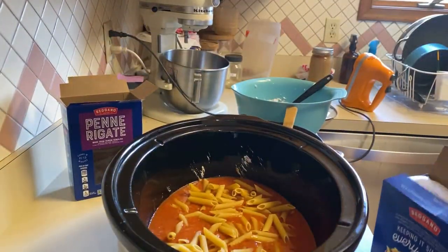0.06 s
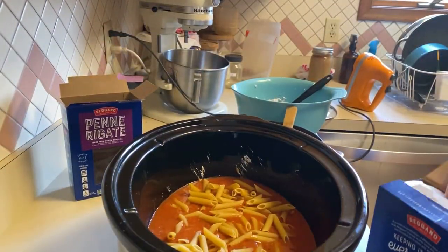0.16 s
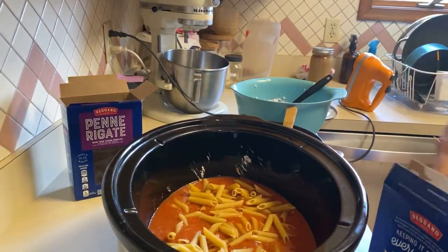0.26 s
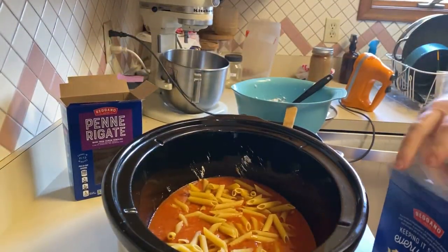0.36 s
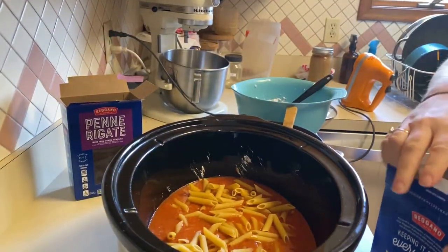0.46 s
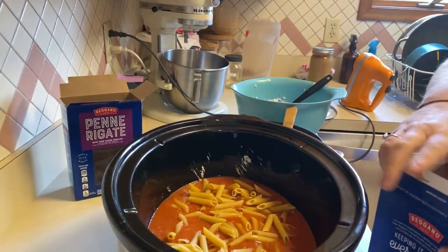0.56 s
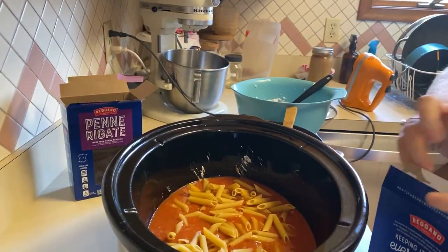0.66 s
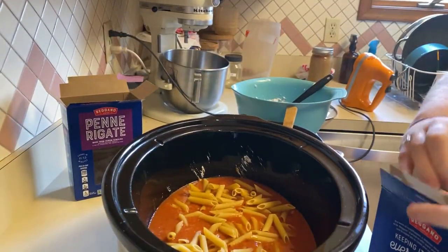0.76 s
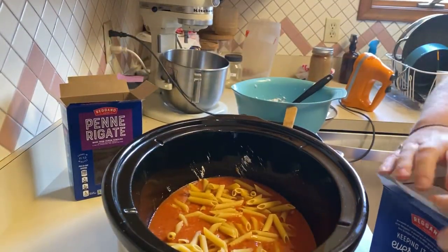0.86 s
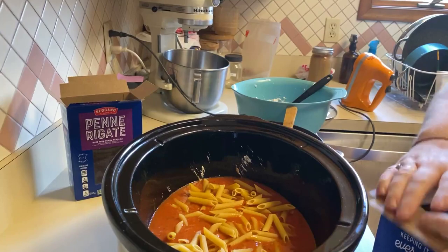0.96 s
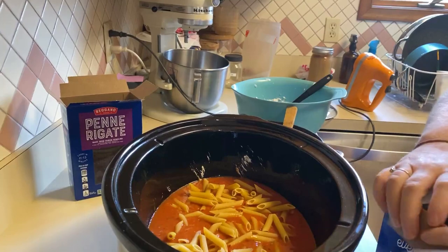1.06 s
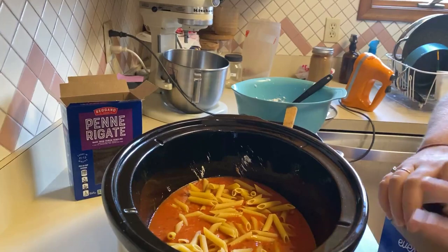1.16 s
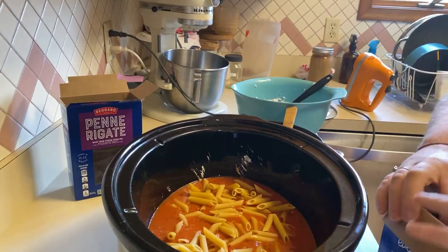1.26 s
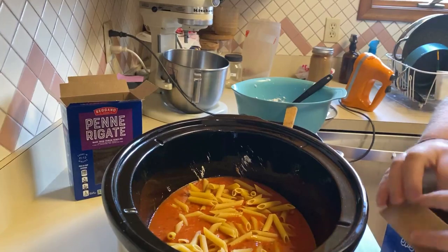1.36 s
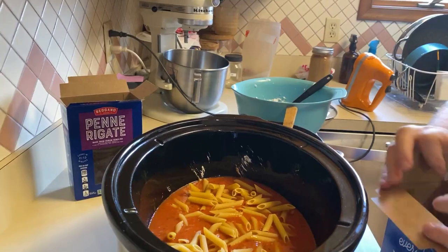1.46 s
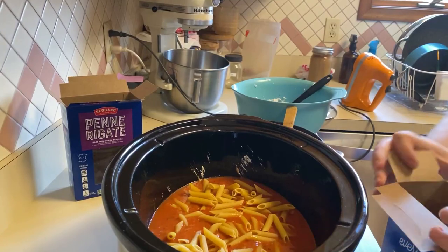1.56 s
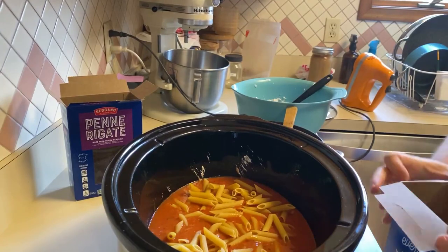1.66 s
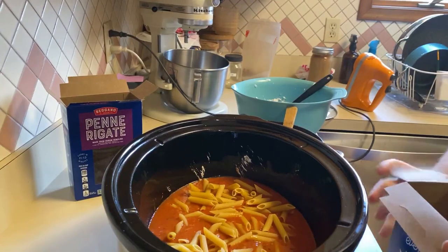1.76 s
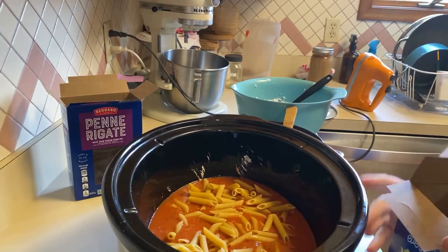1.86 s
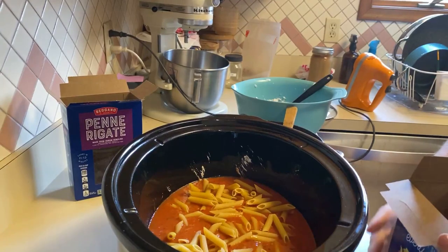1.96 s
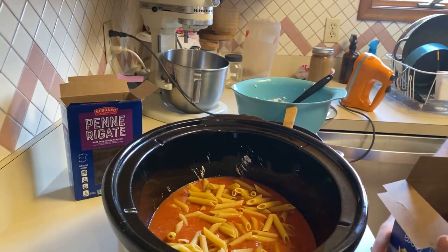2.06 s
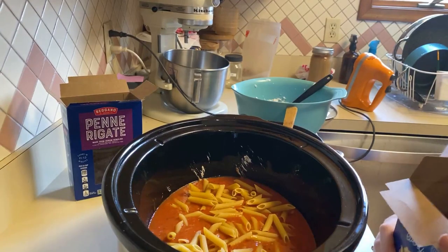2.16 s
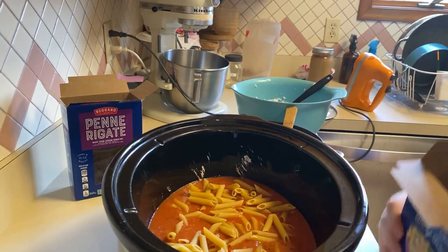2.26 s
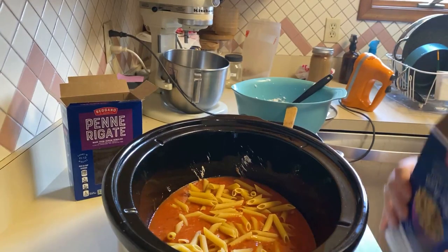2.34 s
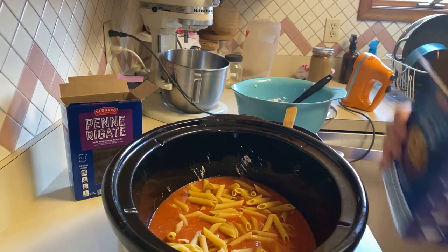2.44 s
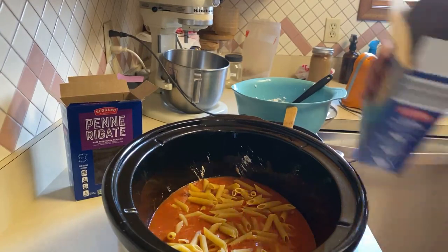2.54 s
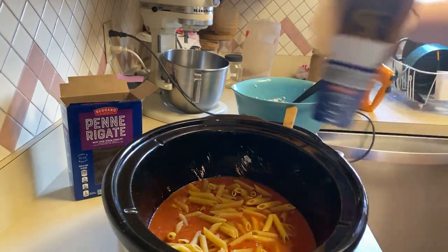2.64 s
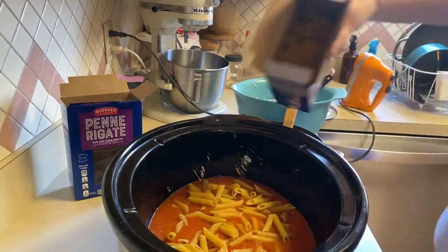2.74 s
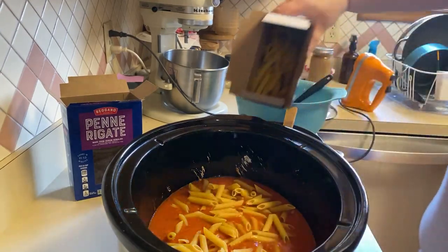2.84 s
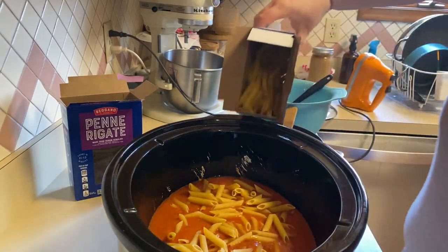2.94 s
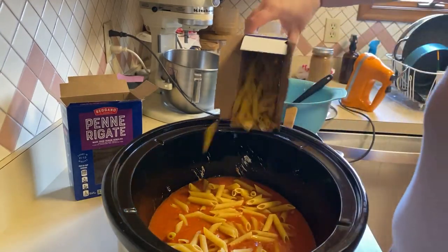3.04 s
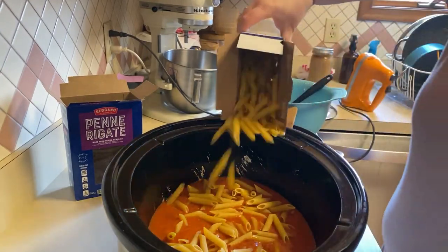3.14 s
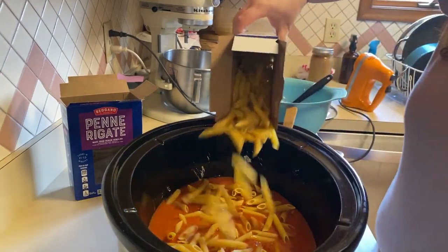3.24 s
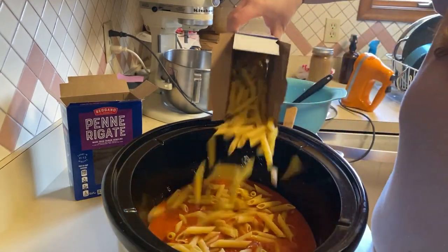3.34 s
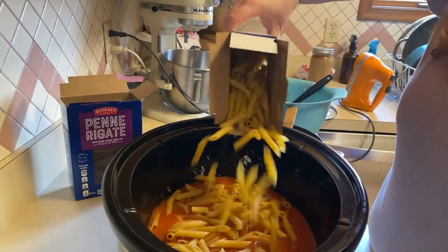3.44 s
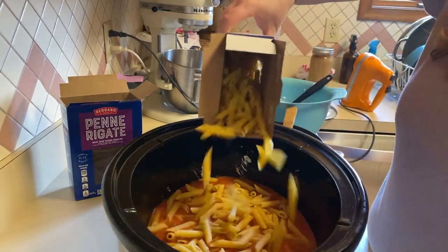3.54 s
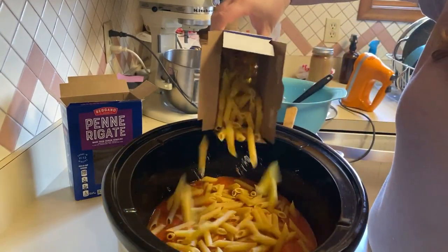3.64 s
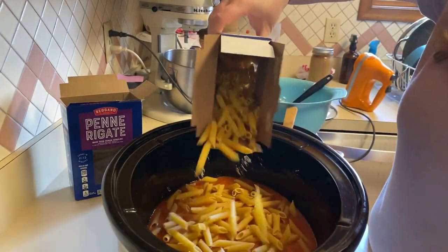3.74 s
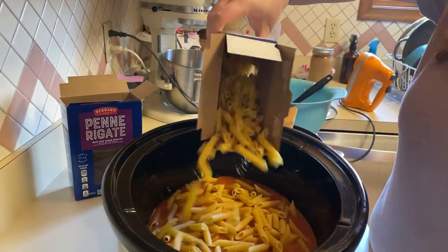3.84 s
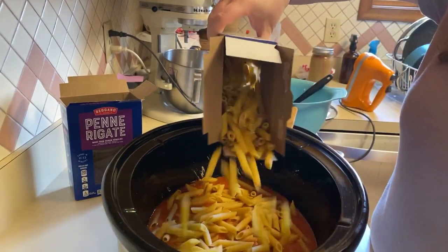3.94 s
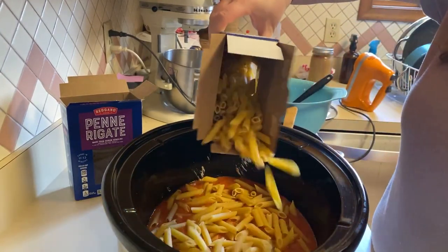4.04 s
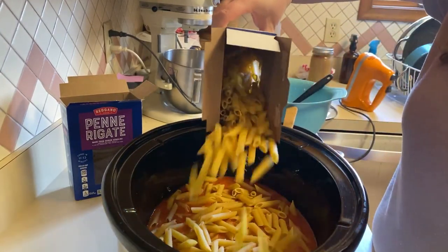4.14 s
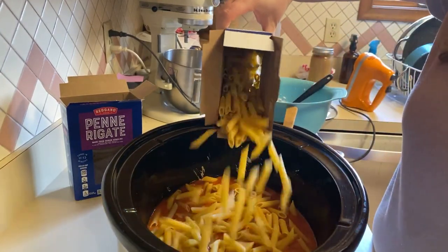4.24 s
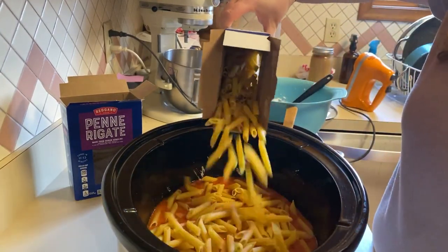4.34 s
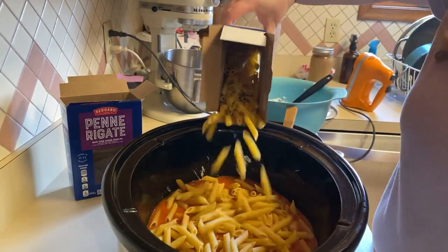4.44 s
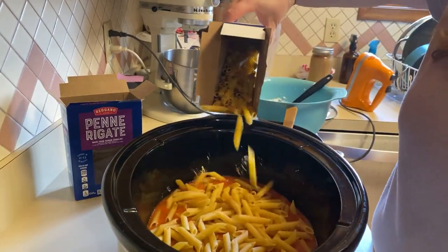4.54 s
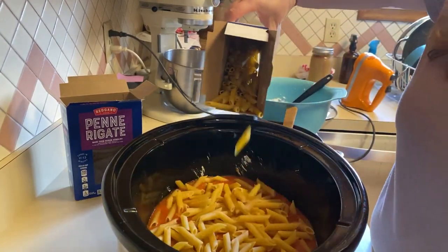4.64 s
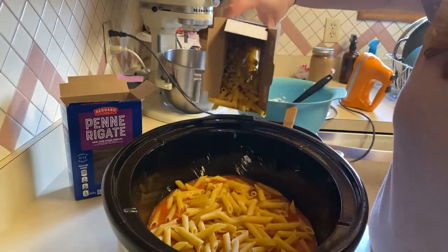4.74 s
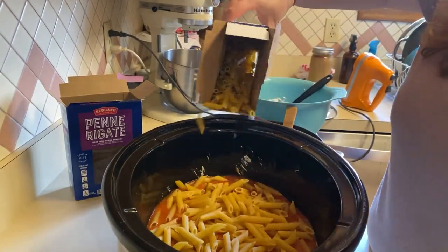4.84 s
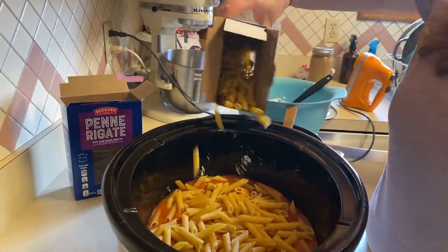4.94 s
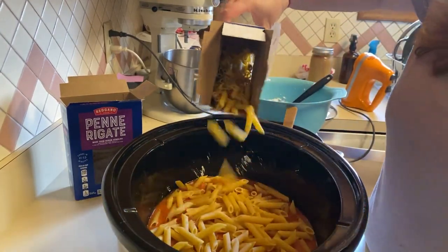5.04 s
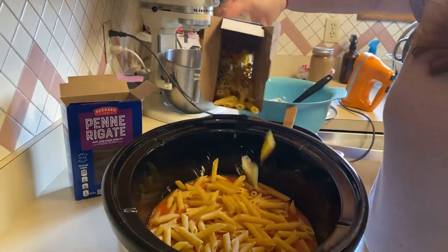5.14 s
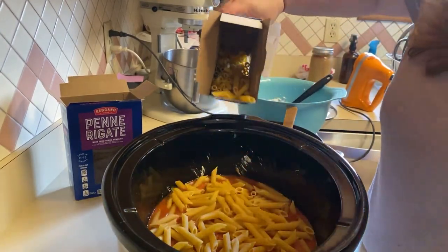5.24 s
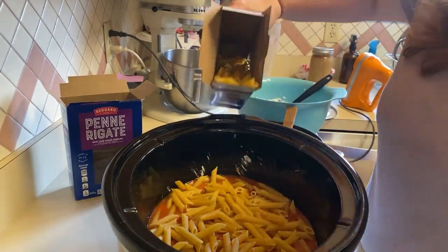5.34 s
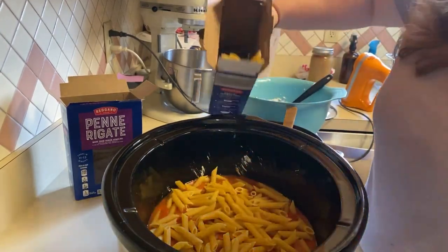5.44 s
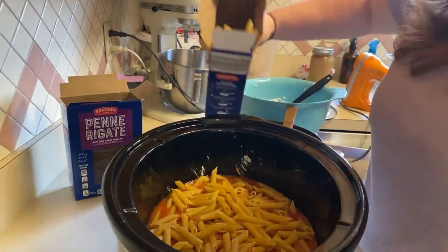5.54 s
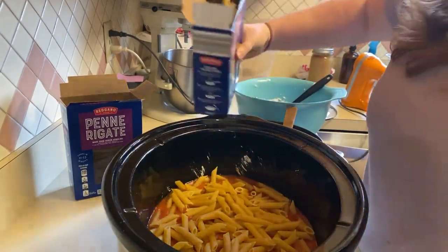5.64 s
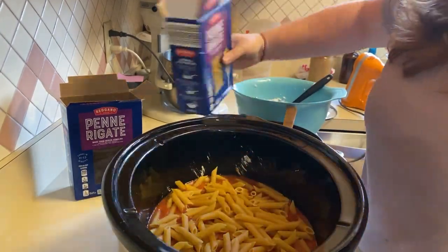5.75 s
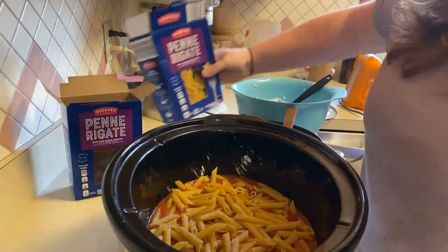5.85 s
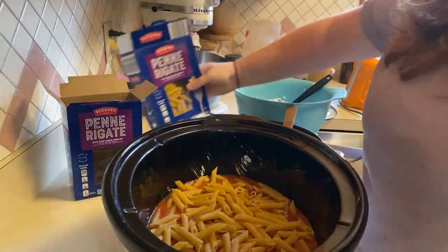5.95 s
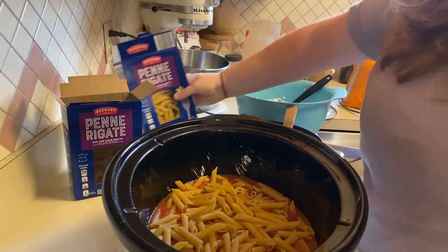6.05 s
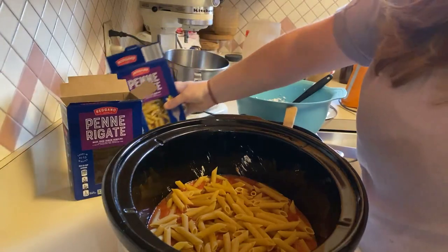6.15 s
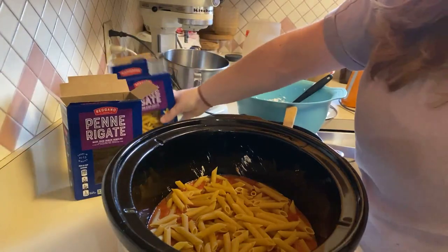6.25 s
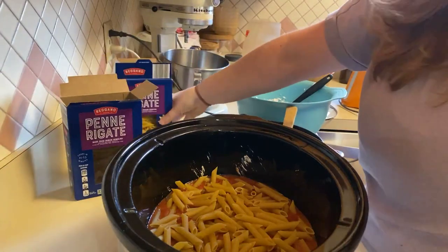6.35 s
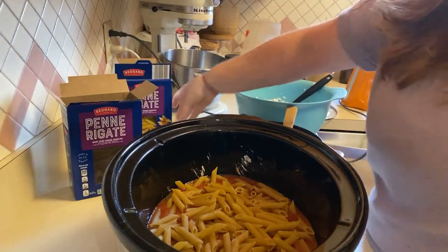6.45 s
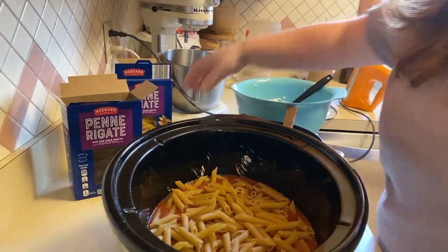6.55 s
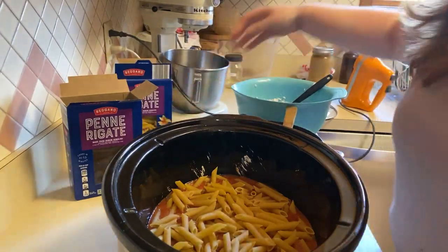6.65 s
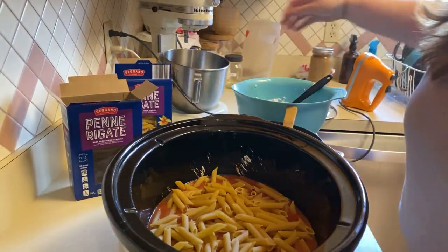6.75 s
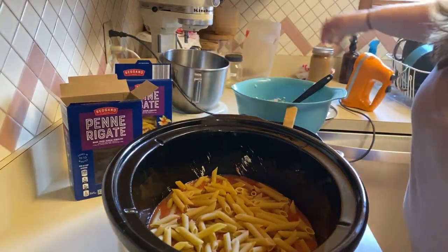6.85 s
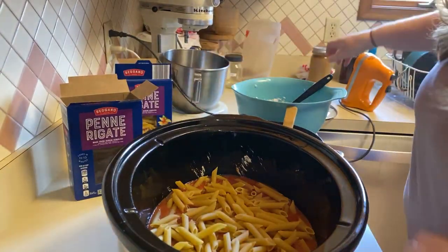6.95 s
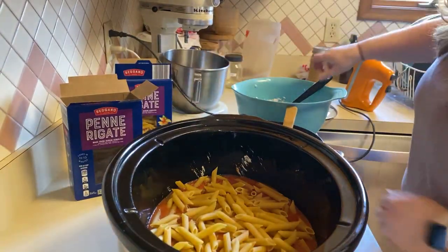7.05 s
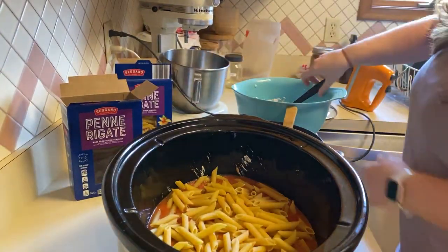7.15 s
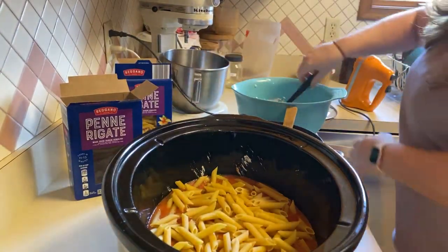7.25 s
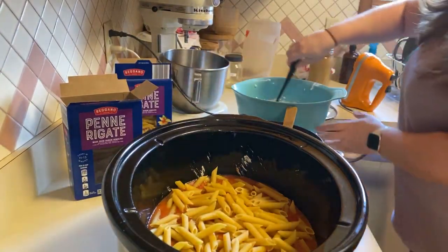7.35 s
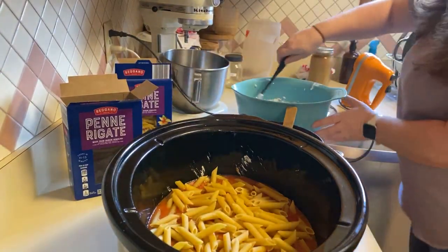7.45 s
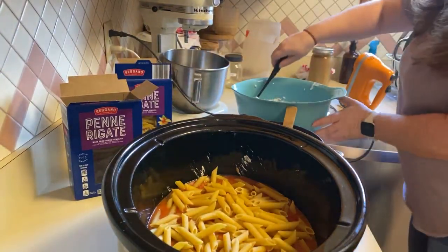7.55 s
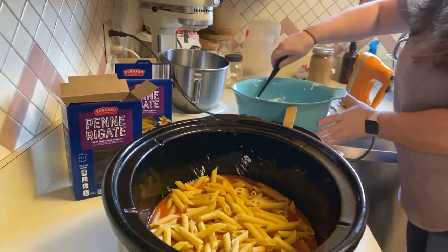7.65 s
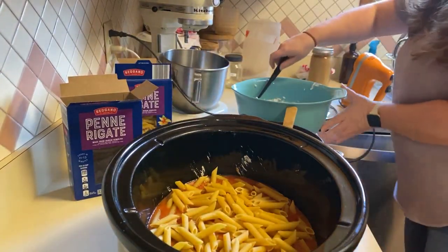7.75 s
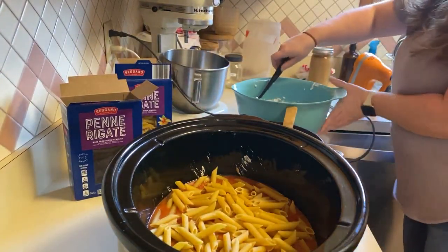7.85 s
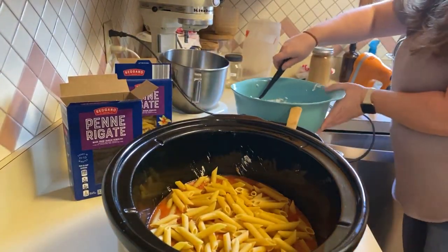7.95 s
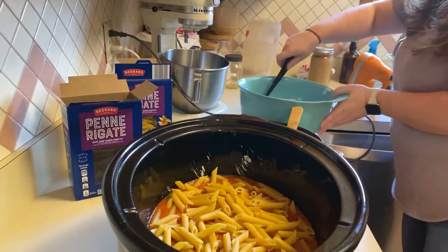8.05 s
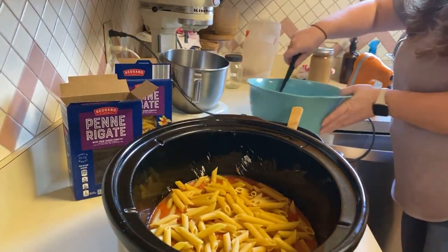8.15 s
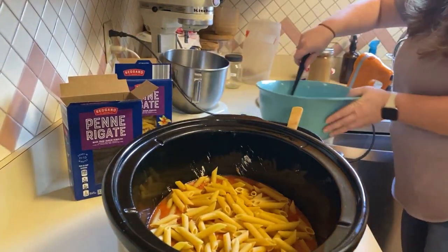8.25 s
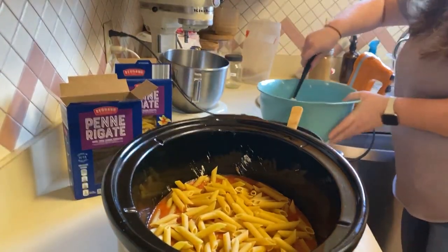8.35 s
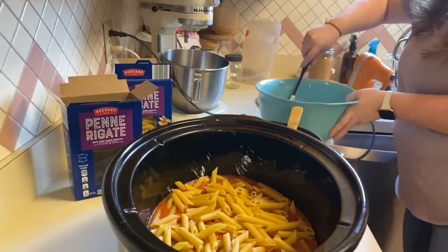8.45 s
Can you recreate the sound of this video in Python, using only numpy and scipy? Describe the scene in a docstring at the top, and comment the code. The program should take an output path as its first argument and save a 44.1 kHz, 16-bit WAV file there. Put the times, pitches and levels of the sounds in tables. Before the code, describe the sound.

Dry penne rattles inside cardboard, quiet fumbling follows, then a bright pour into a pot, last shakes, a boxy thud and a low bowl bump.

```python
"""Dry pasta poured from a box

A cardboard box of tube pasta is opened, tipped over a pot, shaken and set down; then a bowl is lifted.
Random collisions make walls rattle, tubes clink and box air sound; single knocks are scatters of ticks.
Coloured noise gives box boom, hollow room tone and hush; decaying sines give hollow knocks and thumps.
Rubs are noise in gliding resonances. Two ports hear direct sound and changing reflections.
"""
import sys
import numpy as np
from scipy import signal
from scipy.fft import rfft, irfft, next_fast_len
from scipy.io import wavfile
from scipy.ndimage import uniform_filter1d

SR = 44100
rng = np.random.default_rng(int(sys.argv[2]) if len(sys.argv) > 2 else 0)


def wav_record(signal):
    """Record a signal, one row per channel, as 16-bit PCM in the file named by sys.argv[1]."""
    frames = np.transpose(np.atleast_2d(signal))
    bounded = np.clip(frames, -1, 1)
    # unit amplitude maps onto the largest positive 16-bit level
    quanta = np.round(bounded * 32767).astype(np.int16)
    wavfile.write(sys.argv[1], SR, quanta)


N = 374850


def amp(db):
    """Decibels to amplitude ratio."""
    return 10 ** (np.asarray(db) / 20)


def evened(x):
    """Scales to rms 1."""
    return x / np.sqrt(np.mean(x ** 2) + 1e-20)


def peaked(x):
    """Scales to peak 1."""
    return x / abs(x).max()


def read(points, hz):
    """Interpolates a table over log frequency."""
    f, value = np.transpose(points)
    return np.interp(np.log(hz + 1), np.log(f + 1), value)


def curve(rows):
    """Interpolates (time_s, value) rows over the whole scene."""
    rows = np.array(sorted(rows))
    return np.interp(np.arange(N) / SR, rows[:, 0], rows[:, 1])


def add(mix, s, sound):
    """Mixes a sound in from s seconds, cut at the end."""
    part = mix[..., round(s * SR):][..., :sound.shape[-1]]
    part += sound[..., :part.shape[-1]]


def body(spectrum, modes=(), size=8192):
    """Causal impulse response of energy 1: minimum phase, with the given colour and resonances."""
    hz = np.abs(np.fft.fftfreq(size, 1 / SR))
    db = read(spectrum, hz)
    for mode_hz, width_hz, mode_db in modes:
        db = db + mode_db / (1 + (2 * (hz - mode_hz) / width_hz) ** 2)
    log_gain = np.log(amp(np.maximum(db, -100)))
    phase = -signal.hilbert(log_gain).imag
    taps = np.fft.ifft(np.exp(log_gain + 1j * phase)).real[:size // 2]
    return taps / np.linalg.norm(taps)


def drift(fast_s, slow_s):
    """Random curve of rms 1 that changes between the two time scales."""
    x = rng.standard_normal(N)
    for _ in range(2):
        x = uniform_filter1d(x, int(fast_s * SR))
    return evened(x - uniform_filter1d(x, int(slow_s * SR)))


def rattle(level_db, low_hz, high_hz, per_s, spread_db, cycles, clump_db, taps, count=11):
    """Many small collisions, each ringing briefly at its own pitch, in clumps."""
    size = amp(spread_db * np.minimum(rng.exponential(1, N), 4))
    size *= rng.random(N) < per_s / SR
    size = evened(size * amp(clump_db * drift(0.0042, 0.052)))
    size = size * rng.choice([-1., 1.], N) * amp(level_db)
    kind, t, out = rng.integers(0, count, N), np.arange(1500) / SR, np.zeros(N)
    for k, hz in enumerate(np.geomspace(low_hz, high_hz, count)):
        grain = np.exp(-np.pi * hz * t / cycles) * np.cos(2 * np.pi * hz * t)
        grain *= np.sqrt(hz / low_hz) / np.linalg.norm(grain)
        out += signal.oaconvolve(size * (kind == k), grain)[:N]
    coloured = signal.oaconvolve(out, taps)[:N]
    return coloured * np.std(size) / np.std(coloured)


def murmur(level_db, spectrum, lumpy_db, fast_s):
    """Coloured noise in lumps."""
    noise = signal.oaconvolve(rng.standard_normal(N), body(spectrum))[:N]
    return evened(noise * amp(lumpy_db * drift(fast_s, 0.065))) * amp(level_db)


def resonate(x, hz, width_hz):
    """Shifts the curve hz down to zero, smooths, and shifts back: a moving resonance of gain 1."""
    turn = np.exp(2j * np.pi * np.cumsum(hz) / SR)
    r = np.exp(-np.pi * width_hz / SR)
    return 2 * (turn * signal.lfilter([1 - r], [1, -r], x / turn)).real


def steeply(x, hz, width_hz):
    """The same resonance met twice, so that its flanks are steep."""
    return resonate(resonate(x, hz, width_hz), hz, width_hz)


def brighten(x, level_db):
    """Louder clinks are brighter: the top above 7 kHz grows faster than the level."""
    top = signal.sosfilt(signal.butter(2, 7000, "high", fs=SR, output="sos"), x)
    top_db = np.clip(0.9 * (level_db + 56.5), -25, 8)
    return x + (amp(top_db) - 1) * top


# stirring of tubes, cardboard or bowl, one level curve: time_s, level_db (relative)
STIR_POINTS = [
    [(0.0, -33.5), (0.016, -37), (0.082, -39.5), (0.124, -42), (0.246, -40), (0.274, -49), (0.35, -35.5)],
    [(0.36, -48), (0.372, -30.5), (0.514, -56), (0.526, -43), (0.546, -50), (0.572, -40), (0.622, -60),
     (0.644, -37.5), (0.78, -68)],
    [(0.79, -92), (0.83, -58), (0.884, -83.5), (1.066, -66), (1.138, -81), (1.21, -74), (1.246, -88.5),
     (1.28, -42.5), (1.5, -76)],
    [(1.51, -79), (1.578, -82), (1.628, -73.5), (1.67, -54.5), (1.71, -87.5), (1.762, -40.5), (1.89, -90),
     (1.99, -75)],
    [(2.0, -59.5), (2.05, -35.5), (2.104, -52), (2.122, -32.5), (2.274, -52), (2.366, -33.5),
     (2.454, -54.5), (2.462, -52.5), (2.64, -70)],
    [(2.65, -68), (2.666, -62), (2.756, -35.5), (2.776, -25.5), (2.802, -29.5), (2.882, -32), (2.894, -21),
     (2.93, -26.5)],
    [(2.94, -23.5), (3.238, -29), (3.256, -24), (3.334, -30), (3.372, -24.5), (3.452, -29), (3.5, -23)],
    [(3.51, -30.5), (3.78, -32.5), (4.346, -28.5), (4.4, -32), (4.462, -27), (4.47, -33), (4.614, -36),
     (4.64, -54)],
    [(4.65, -39.5), (4.714, -66.5), (4.726, -43.5), (4.75, -56), (4.958, -32), (5.082, -31.5),
     (5.11, -37.5), (5.216, -35.5), (5.34, -88.5)],
    [(5.35, -83), (5.452, -72), (5.472, -56), (5.558, -88), (5.614, -57.5), (5.66, -69), (5.83, -24.5),
     (5.994, -33.5), (6.12, -47.5)],
    [(6.13, -40.5), (6.158, -39.5), (6.166, -30.5), (6.188, -39), (6.202, -23), (6.258, -33.5),
     (6.378, -30.5), (6.422, -36.5), (6.56, -39)],
    [(6.57, -46.5), (6.62, -48.5), (6.648, -60), (6.66, -54.5), (6.736, -46.5), (6.824, -66), (6.896, -107),
     (6.92, -99.5)],
    [(7.3, -107), (7.356, -107), (7.385, -73), (7.438, -69), (7.51, -70), (7.626, -88), (7.8, -106)],
    [(7.81, -107), (7.856, -107), (7.868, -69.5), (7.964, -47), (8.022, -74), (8.14, -71), (8.286, -78),
     (8.298, -47), (8.486, -79.5), (8.5, -89)],
]


def stirring():
    """How hard the contents are stirred, over time."""
    return curve(sum(STIR_POINTS, []))


# what each gesture wakes: start_s, clinks_db, air_db, boom_db (relative to stirring), wall_hz
# box turned, opened, lifted, poured, shaken, set down; spoon moved; bowl nudged and lifted
GESTURE_STEPS = [(0, -8.5, -4, -18, 1520), (0.449, -18, -10.5, -30, 1460), (.78, 7, -28.5, -15, 1900),
                 (1.25, -1, -17, -41, 1750), (1.5, -2.5, -26, -34, 2800), (1.861, 13, 2, -16, 2480),
                 (2.011, -10, -10.5, -28.5, 1600), (2.65, -1.5, -2.5, -17.5, 2170),
                 (3.1, 3.5, -3, -26, 2100), (3.499, 5, -1, -25.5, 2020), (4.52, 4, -7.5, -10, 2600),
                 (4.759, -13, -7.5, -14.5, 1680), (4.911, -3, -4, -12.5, 1900),
                 (5.03, -3.5, -6.5, -20, 2210), (5.3, -15.5, -7.5, -5.5, 2400),
                 (5.741, -2, -1, -10.5, 1730), (6.12, 0.5, -14, -38, 2300), (6.19, 0, -0.5, -5, 1900),
                 (6.571, -1.5, -17, -12, 2080), (7.299, 1, -22, -16, 2820), (7.8, -15.5, -2.5, 11.5, 1900),
                 (8.031, 1, -11, 3, 2400), (8.28, -11.5, -10, 14, 2120)]
CHANGE_S = 0.023


def gesture(column):
    """Holds the value of each gesture and blends it into the next."""
    rows = np.array(GESTURE_STEPS)
    step = np.searchsorted(rows[:, 0], np.arange(N) / SR) - 1
    return uniform_filter1d(rows[np.clip(step, 0, None), column], int(CHANGE_S * SR))


def woken(stir_db, column, growth):
    """Level of a layer; growth is extra dB per dB of stirring above -40 dB."""
    return stir_db + gesture(column) + growth * (stir_db + 40)


# cardboard colour: pitch_hz, density_db_per_hz
CARD_COLOUR = [(650, -29.5), (1100, -0.5), (1370, -3.5), (1540, -1), (1900, -5.5), (3800, -0.5),
               (4940, -30), (8360, -120)]
# cardboard resonances: pitch_hz, width_hz, level_db
CARD_RESONANCES = [(1380, 33, 5), (1900, 260, 2.5), (2400, 790, 1.5)]


def wall_rattle(stir_db):
    """Rattle on cardboard: a narrow band when quiet, broader when loud."""
    card = body(CARD_COLOUR, CARD_RESONANCES)
    broad = rattle(stir_db - 6.0, 1100, 3594, per_s=1000, spread_db=-1.0, cycles=6.2,
                   clump_db=0.0, taps=card, count=23)
    broad_db = np.clip(0.3 * (stir_db + 28.0), -22, 3) - 1.0
    narrow = steeply(broad, gesture(column=4), width_hz=2050)
    return amp(broad_db) * broad + amp(3.0) * narrow


# pasta tube colour: pitch_hz, density_db_per_hz
TUBE_COLOUR = [(1820, -27.5), (3100, 3.5), (4220, 6.5), (6880, -1), (9170, -8), (10800, -10), (11500, -22),
               (11900, -47.5), (22000, -120)]
# pasta tube resonances: pitch_hz, width_hz, level_db
TUBE_RESONANCES = [(4450, 82, -0.5), (5013, 65, 3.5), (5636, 290, -2), (6400, 180, 2)]


def tube_body():
    """Ring of a dry pasta tube."""
    return body(TUBE_COLOUR, TUBE_RESONANCES)


def tube_clinks(stir_db, tube):
    """Tubes strike each other: dense high grains, brighter when loud."""
    clink_db = woken(stir_db, column=1, growth=0.023)
    clinks = rattle(clink_db - 5.5, 3200, 9560, per_s=1800, spread_db=1.0, cycles=6.9,
                    clump_db=1.5, taps=tube, count=23)
    return brighten(clinks, clink_db - 18.5)


# box air colour: pitch_hz, density_db_per_hz
AIR_COLOUR = [(500, -28.5), (740, -14.5), (890, -7.5), (1050, -14), (1200, -19.5), (1700, -45.5)]


def box_air(stir_db):
    """Collisions excite the air in the box: short dull grains."""
    air_db = woken(stir_db, column=2, growth=0.022)
    return rattle(air_db - 3.5, 810, 1100, per_s=500, spread_db=2.0, cycles=1.9,
                  clump_db=0.5, taps=body(AIR_COLOUR), count=3)


# boom colour: pitch_hz, density_db_per_hz
BOOM_COLOUR = [(29, -46.5), (50, -46.5), (81, -33), (124, -6), (210, -1), (276, -2), (350, -1.5),
               (460, -49), (770, -120)]


def box_boom(stir_db):
    """Low lumpy noise that grows faster than the stirring."""
    boom_db = woken(stir_db, column=3, growth=0.076)
    return murmur(boom_db - 5.5, BOOM_COLOUR, lumpy_db=4.0, fast_s=0.03)


# hollow tone colour: pitch_hz, density_db_per_hz
TONE_COLOUR = [(120, -44), (200, -17), (300, -11.5), (513, 9.5), (622, 5), (770, -13), (901, -9),
               (1100, -31.5), (1430, -61.5), (2420, -120)]
# hollow tone, one level curve: time_s, level_db (relative)
TONE_POINTS = [
    [(0.0, -69.5), (0.254, -40.5), (0.316, -68.5), (0.378, -45), (0.514, -53), (0.7, -109)],
    [(0.75, -89), (1.104, -72), (1.99, -78), (2.04, -57.5), (2.576, -81), (2.68, -71)],
    [(2.7, -91), (2.77, -48.5), (4.32, -43), (4.9, -54.5), (4.93, -42.5), (5.2, -49.5)],
    [(5.25, -58.5), (5.668, -65), (5.754, -56), (5.826, -35.5), (6.01, -36.5), (6.16, -65.5)],
    [(6.18, -52.5), (6.214, -19.5), (6.244, -36), (6.376, -36.5), (6.882, -71.5), (6.95, -95)],
    [(7.0, -84), (7.15, -81), (7.924, -73), (7.944, -47), (8.04, -54)],
    [(8.06, -57.5), (8.148, -51.5), (8.278, -56), (8.3, -45.5), (8.362, -43.5), (8.5, -53)],
]


def room_tone():
    """Hollow band of noise that comes and goes."""
    level_db = curve(sum(TONE_POINTS, [])) + 0.6
    return murmur(level_db, TONE_COLOUR, lumpy_db=4.0, fast_s=0.033)


# hush colour: pitch_hz, density_db_per_hz
HUSH_COLOUR = [(24, -72.5), (40, -46), (146, -8.5), (275, -17), (442, -9), (484, 0.5), (567, -16),
               (1120, -35.5), (9000, -38), (11700, -84.5), (19800, -120)]


def hush():
    """Faint coloured noise throughout."""
    return murmur(-81.5, HUSH_COLOUR, lumpy_db=3.0, fast_s=0.027)


# knocks and snaps: start_s, card_db, clink_db (both relative), pitch_hz
KNOCK_EVENTS = [(0.0358, -18, -37.5, 3950), (0.0875, -18.5, -71, 1550), (0.1506, -22.5, -46.5, 1360),
                (0.172, -25.5, -65, 1390), (0.2322, -23, -50, 1550), (0.2549, -15.5, -42, 1450),
                (0.306, -29, -69, 2130), (0.3725, -13.5, -63.5, 1510), (0.5248, -34, -81, 1080),
                (0.571, -23, -57, 1910), (0.69, -26.5, -51, 1420), (0.9238, -41, -86, 2300),
                (0.9893, -39.5, -85, 1880), (1.0546, -28.5, -43.5, 2080), (1.2717, -28, -42, 1770),
                (1.3498, -26, -46, 1640), (1.583, -43.5, -73, 3000), (1.735, -35, -46, 3540),
                (1.7573, -21.5, -56, 3280), (1.781, -27, -75, 2200), (2.026, -35.5, -47, 1060),
                (2.0413, -26.5, -42, 1010), (2.1194, -23, -60, 2160), (2.174, -32, -67, 1280),
                (2.2993, -29, -52, 1560), (2.333, -48, -51, 1530), (2.4629, -22.5, -42.5, 1820),
                (2.496, -33, -52, 1690), (2.688, -31, -62, 1990), (2.7393, -30.5, -44.5, 870),
                (2.77, -11.5, -57, 2170), (2.809, -16, -53, 930), (2.8915, -19.5, -34, 820),
                (2.9645, -10, -24.5, 920), (3.014, -16, -33, 880), (3.0897, -13.5, -25.5, 1400),
                (3.137, -17.5, -39, 3000), (3.171, -14.5, -27, 1900), (3.19, -21, -31.5, 3470),
                (3.2527, -15, -32.5, 1130), (3.284, -25.5, -25, 1900), (3.241, -13, -38, 1070),
                (3.3595, -19, -23, 2340), (3.4004, -13.5, -24, 1310), (3.537, -15, -35.5, 1700),
                (3.5672, -13, -23, 1700), (3.631, -17.5, -23, 2500), (3.726, -24, -26.5, 1020),
                (3.788, -17, -35, 4500), (3.824, -14.5, -47, 8000), (3.9194, -17.5, -50, 850),
                (3.943, -9, -44, 6240), (3.9799, -24, -21, 820), (3.675, -14.5, -26, 1900),
                (3.8868, -11.5, -38, 2870), (4.0388, -19, -26.5, 910), (4.1198, -15, -41, 1570),
                (4.13, -11.5, -47.5, 7300), (4.157, -10.5, -50.5, 1700), (4.2487, -13, -22, 824),
                (4.3054, -21.5, -19, 2390), (4.4128, -16.5, -24, 1830), (4.424, -7.5, -32.5, 6500),
                (4.4786, -7.5, -41, 8100), (4.4553, -18, -27, 1920), (4.4954, -12.5, -26, 2530),
                (4.5443, -23, -20, 3330), (4.596, -17.5, -38, 1850), (4.6474, -31, -27, 5170),
                (4.7035, -42, -49, 4430), (4.7211, -11.5, -28.5, 4900), (4.84, -35, -49, 5000),
                (4.8593, -23.5, -46, 1980), (4.9041, -19, -61, 890), (4.9294, -16, -38.5, 960),
                (5.0092, -17, -27.5, 2520), (5.053, -13, -24.5, 1900), (5.0742, -13.5, -26, 2010),
                (5.1366, -12.5, -23.5, 3380), (5.178, -23, -27, 880), (5.2012, -8.5, -21.5, 2670),
                (5.3954, -47, -72, 3650), (5.466, -41.5, -92, 996), (5.605, -39, -61, 3020),
                (5.678, -43, -50.5, 4520), (5.7554, -33, -62, 950), (5.82, -27, -46.5, 1540),
                (6.125, -26, -31, 1940), (6.165, -17.5, -25.5, 4770), (6.2, -14, -41.5, 970),
                (6.4829, -30, -37, 930), (6.5517, -26, -39, 1550), (6.6105, -22, -44.5, 2200),
                (6.654, -23.5, -40.5, 1840), (6.6842, -31, -43, 1700), (6.71, -29, -49, 2200),
                (6.728, -28.5, -50, 2180), (6.4955, -20, -41, 1020), (7.944, -30.5, -71, 873),
                (7.869, -36, -85, 1396), (8.2965, -32.5, -67, 1050)]
KNOCK_T60_S, KNOCK_CYCLES = .03, 35  # fixed time plus some cycles of the pitch
CRACK_DB, CRACK_S = 9, .003  # first contact stands out over the scatter
TICK_DB, RING_WIDTH = 5, .09  # sharp tick rings the wall; width as share of pitch
SNAP_DB, SNAP_S = -8, .001  # short bright snap
CLINK_RISE_S, CLINK_T60_S = 0.0022, 0.021  # tubes answer a moment later
CLINK_TAIL_DB, CLINK_TAIL_S = -13.5, 0.18  # then a fainter scatter


def knocks(tube):
    """Each knock is a dying scatter of ticks: dull ones around the pitch of the wall hit, and clinks."""
    out, t = np.zeros(N), np.arange(5000) / SR
    burst = amp(-60 * t / CLINK_T60_S) + amp(CLINK_TAIL_DB - 60 * t / CLINK_TAIL_S)
    burst *= 1 - np.exp(-(t / CLINK_RISE_S) ** 2)
    short = t[:600]
    for s, card_db, clink_db, hz in KNOCK_EVENTS:
        t60 = np.clip(KNOCK_T60_S + KNOCK_CYCLES / hz, .01, .3)
        fade = amp(-60 * t / t60) * (1 - np.exp(-t / 0.00072))
        fade *= 1 + amp(CRACK_DB) * np.exp(-t / CRACK_S)
        shake = rng.standard_normal((3, len(t)))
        scatter = shake[:2] * amp(1.5 * shake[2]) * [fade, burst]
        wall = hz * short * np.exp(-np.pi * .35 * hz * short) * np.sin(2 * np.pi * hz * short)
        dull = signal.oaconvolve(scatter[0], np.diff(wall, 2))[:len(t)]
        bright = signal.oaconvolve(scatter[1], tube)[:len(t)]
        bright = brighten(peaked(bright), clink_db - 5.5)
        tick = np.exp(-np.pi * RING_WIDTH * hz * t) * np.sin(2 * np.pi * hz * t)
        tick *= 1 - np.exp(-3 * hz * t)
        snap = signal.oaconvolve(shake[2] * t * np.exp(-t / SNAP_S), tube)[:len(t)]
        cardboard = peaked(dull) + amp(TICK_DB) * tick + amp(SNAP_DB) * peaked(snap)
        add(out, s, amp(card_db - 9.5) * cardboard + amp(clink_db + 9.0) * bright)
    return out


# hollow knocks of box and bowl: start_s, level_db (relative), pitch_hz
HOLLOW_EVENTS = [(0.232, -33.5, 428), (0.395, -29, 338), (0.484, -33.5, 498), (3.045, -24.5, 200),
                 (3.105, -26.5, 200), (3.15, -31.5, 211), (4.43, -28, 222), (5.821, -27, 510),
                 (5.872, -22, 340), (5.988, -25, 550), (6.195, -15, 314), (6.211, -15.5, 502),
                 (6.221, -14, 600), (6.264, -19.5, 404), (6.326, -25, 340), (6.365, -18, 614),
                 (6.384, -17.5, 605), (6.435, -20, 555), (6.514, -24, 564), (8.121, -33.5, 477),
                 (8.196, -33, 484), (8.229, -31.5, 508), (8.297, -19, 418), (8.312, -18, 250),
                 (8.41, -23.5, 245)]
HOLLOW_T60_S, HOLLOW_RISE_S = 0.079, 0.0022


def hollow_knocks():
    """Each knock rings the air of box or bowl on a close pair of tones."""
    out, t = np.zeros(N), np.arange(6000) / SR
    ratios = rng.uniform(0.78, .85, len(HOLLOW_EVENTS))
    for (s, db, hz), ratio in zip(HOLLOW_EVENTS, ratios):
        pair = np.sin(2 * np.pi * hz * t) + 0.29 * np.sin(2 * np.pi * hz * ratio * t)
        ring = pair * amp(-60 * t / HOLLOW_T60_S) * (1 - np.exp(-t / HOLLOW_RISE_S))
        add(out, s, amp(db - 5.5) * peaked(ring))
    return out


# counter modes: pitch_hz (before detuning), level_db, t60_s (before averaging)
COUNTER_MODES = [(98.2, -9, 0.14), (122.4, -4.5, 0.28), (142.7, 1.5, 0.15), (182.2, -2.5, 0.099),
                 (227.8, -12, 0.48), (295, -14, 0.13), (382.2, 3, 0.089), (492.3, -4.5, 0.032),
                 (620, -18.5, 0.025), (874, -4.5, 0.015)]
# blows on box and counter: time_s, low_modes_db, upper_modes_db (before the soft onset)
BLOWS = [(0.254, -38, -46.5), (0.386, -34.5, -29), (1.363, -51, -80), (2.028, -39.5, -41),
         (2.134, -43.5, -73), (2.901, -39.5, -29), (3.099, -27, -47), (3.258, -31, -34.5),
         (3.54, -32.5, -52), (4.424, -37.5, -28.5), (4.644, -42, -55.5), (4.93, -22.5, -32.5),
         (5.019, -32, -37), (5.09, -27, -50.5), (5.821, -49.5, -24.5), (5.899, -47, -18),
         (6.2, -15.5, -24.5), (6.271, -31.5, -33.5), (6.327, -19.5, -30), (6.417, -23.5, -22),
         (7.619, -33, -59), (7.891, -30.5, -69), (7.953, -15.5, -59), (8.176, -42, -74), (8.306, -5, -15.5),
         (8.362, -30.5, -29), (8.401, -16, -30.5)]
THUMP_T60_S = 0.17


def thumps():
    """Each blow rings the modes of the counter, a little detuned; most upper modes die sooner."""
    out, t = np.zeros(N), np.arange(10000) / SR
    for s, low_db, upper_db in BLOWS:
        detune = rng.uniform(0.92, 1.08, len(COUNTER_MODES))
        low, high = np.zeros((2, len(t)))
        for (hz, mode_db, mode_t60), d in zip(COUNTER_MODES, detune):
            t60 = np.sqrt(THUMP_T60_S * np.clip(mode_t60, .04, .4))  # geometric mean
            ring = amp(mode_db - 60 * t / t60) * np.sin(2 * np.pi * hz * d * t)
            add(high if hz > 330 else low, 0, ring)
        blow = amp(low_db) * peaked(low) + amp(upper_db) * peaked(high)
        add(out, s - .001, blow * (1 - np.exp(-t / 0.0032)))
    return out


# fingers, cardboard and spoon sliding:
# start_s, length_s, first_hz, last_hz, width_hz (before widening), level_db (before fades)
RUB_EVENTS = [(0.802, 0.065, 1380, 1470, 300, -53.5), (0.985, 0.047, 2000, 2060, 400, -59),
              (1.183, 0.043, 3230, 3200, 300, -53), (0.804, 0.05, 3730, 2980, 700, -58),
              (2.468, 0.11, 1840, 1570, 400, -50.5), (2.549, 0.081, 1580, 2060, 600, -55.5),
              (2.654, 0.081, 2000, 2640, 500, -48.5), (4.753, 0.038, 1900, 1690, 600, -43),
              (4.816, 0.062, 1410, 2030, 600, -43.5), (5.457, 0.043, 2260, 2400, 700, -56.5),
              (7.367, 0.04, 3500, 2780, 1600, -53), (7.361, 0.031, 4940, 4640, 700, -62),
              (7.475, 0.082, 2410, 2050, 504, -56), (7.436, 0.13, 3480, 2930, 1500, -60.5),
              (8.102, 0.053, 3850, 3770, 200, -58), (8.31, 0.05, 8000, 7700, 704, -68),
              (8.311, 0.11, 4440, 2590, 2500, -62.5)]


def rubs():
    """Fine slips excite one gliding resonance with very steep flanks."""
    out = np.zeros(N)
    for s, length, first_hz, last_hz, width_hz, db in RUB_EVENTS:
        hz = np.linspace(first_hz, last_hz, round(length * SR))
        noise, strength = rng.standard_normal((2, len(hz)))
        slips = noise * amp(3.5 * strength)
        tone = steeply(steeply(slips, hz, 1.24 * width_hz), hz, 1.4 * width_hz)
        add(out, s, amp(db) * evened(tone) * signal.windows.tukey(len(hz), .6))
    return out


# direct sound: pitch_hz, share_of_power
DIRECT_SHARE = [(60, .99), (160, .97), (350, .88), (700, .62), (2000, .57), (5000, .36), (9000, .6)]
# port phase: pitch_hz, left_lead_rad
PORT_LEAD = [(50, 0), (200, -.2), (400, -.7), (780, 1.), (1600, .2), (6500, .6), (8200, -2.4),
             (10000, -3.6), (11500, -5.5)]
# later room decay: pitch_hz, t60_s
ROOM_DECAY = [(100, 0.14), (500, 0.3), (2000, 0.11), (8000, 0.064)]
NEAR_DB, NEAR_S = 16, .014  # pot and counter answer at once: extra level, extra decay t60
PATTERN_S = .05


def kitchen(direct, count=7):
    """Two ports hear direct sound out of step, and each its own reflections, in patterns that take turns."""
    size, span = next_fast_len(N + SR), SR // 4
    hz = np.fft.rfftfreq(size, 1 / SR)
    share = np.clip(read(DIRECT_SHARE, hz), .05, .995)
    ports = np.exp(.5j * read(PORT_LEAD, hz) * np.array([[1], [-1]]))
    out = rfft(direct, size) * np.sqrt(share) * ports
    place = np.arange(N) / SR / PATTERN_S
    for k in range(count):
        taps = np.zeros((2, span))
        at = np.arange(40, span - 20, 20)
        at = at + rng.integers(0, 20, (2, len(at)))
        np.put_along_axis(taps, at, rng.choice([-1., 1.], at.shape), 1)
        taps *= 1 + amp(NEAR_DB - 60 * np.arange(span) / SR / NEAR_S)
        f, t, z = signal.stft(taps, SR, nperseg=256)
        z = z * amp(-60 * t / read(ROOM_DECAY, f)[:, None])
        tail = rfft(signal.istft(z, SR, nperseg=256)[1], size)
        tail /= np.sqrt(uniform_filter1d(abs(tail) ** 2, size=size // 100))  # even overall colour
        away = abs((place - k + count / 2) % count - count / 2)
        fed = direct * np.cos(np.pi / 2 * np.minimum(away, 1))
        out += rfft(fed, size) * np.sqrt(1 - share) * tail
    return irfft(out, size)[:, :N]


# where the hands work: time_s, left_over_right_db
HAND_PAN = [(0.0, -0.5), (0.95, -0.5), (1.6, -1.5), (2.2, -0.5), (8.5, 0)]


def panned(stereo):
    """Tilts the balance between left and right."""
    return stereo * amp(curve(HAND_PAN) / 2 * np.array([[1], [-1]]))


def scene():
    """Sums all sources and places them in the kitchen."""
    tube, stir_db = tube_body(), stirring()
    mix = wall_rattle(stir_db) + tube_clinks(stir_db, tube) + box_air(stir_db) + box_boom(stir_db)
    mix += room_tone() + hush()
    mix += knocks(tube) + hollow_knocks() + thumps() + rubs()
    return panned(kitchen(mix))


def record(dry):
    """The microphone drops the deepest bass; then the band limit."""
    thin = signal.sosfilt(signal.butter(4, 70, "high", fs=SR, output="sos"), dry)
    band = signal.firwin(511, 12000, window=("kaiser", 9), fs=SR)
    return signal.oaconvolve(thin, band[None], "same")


dry = scene()
out = record(dry)
wav_record(out)
```